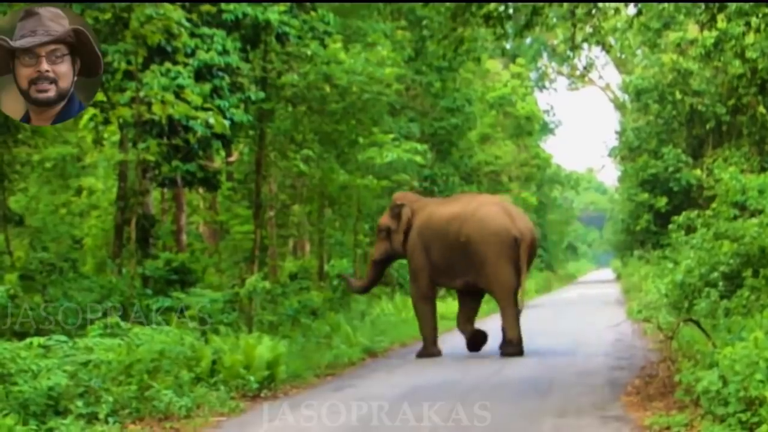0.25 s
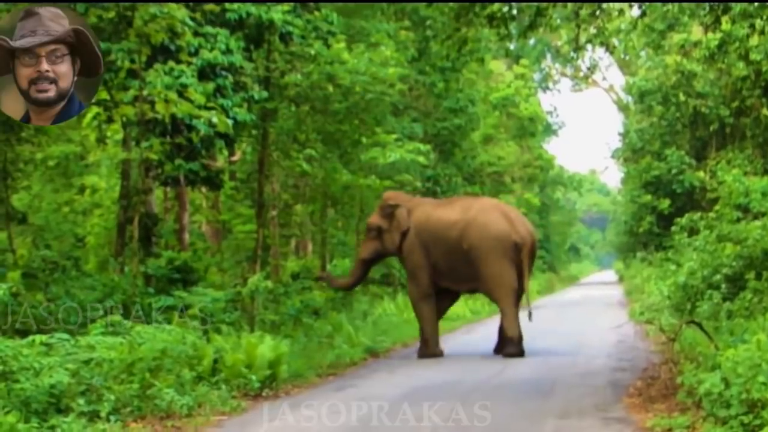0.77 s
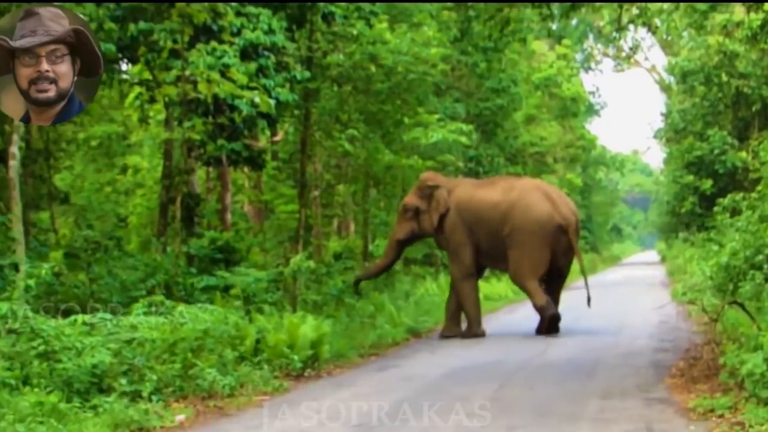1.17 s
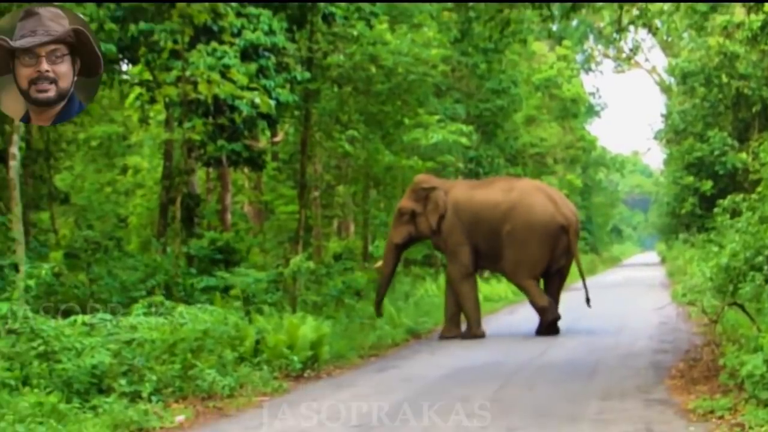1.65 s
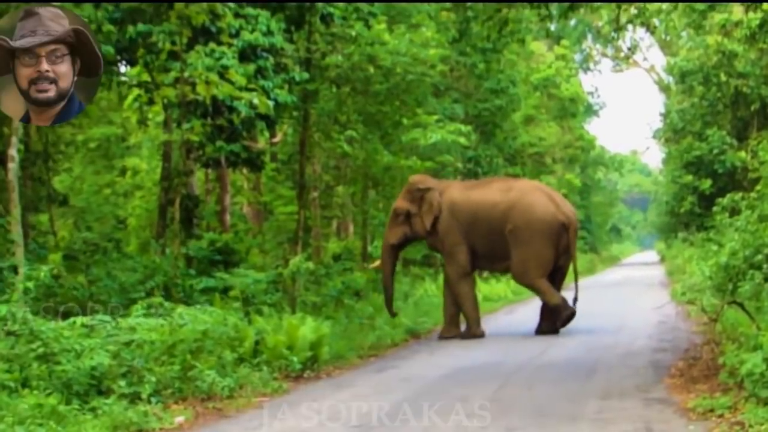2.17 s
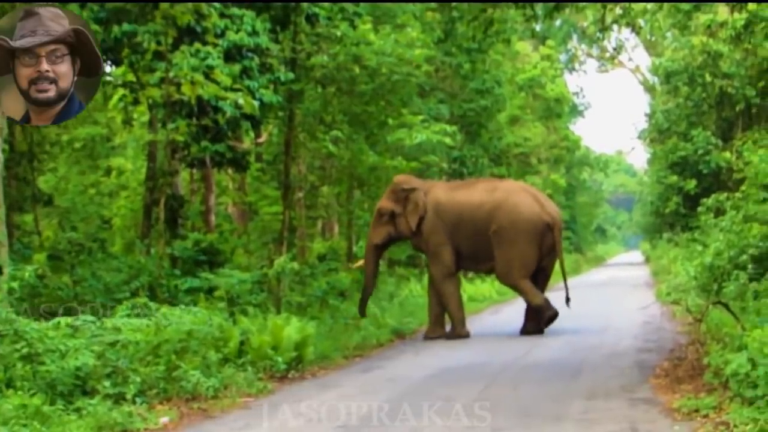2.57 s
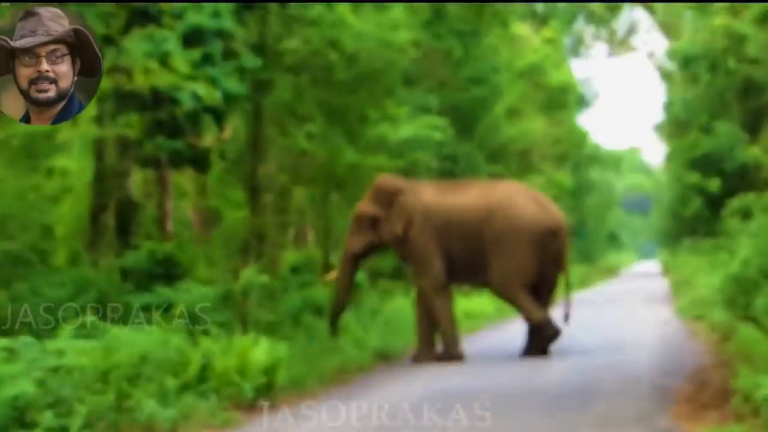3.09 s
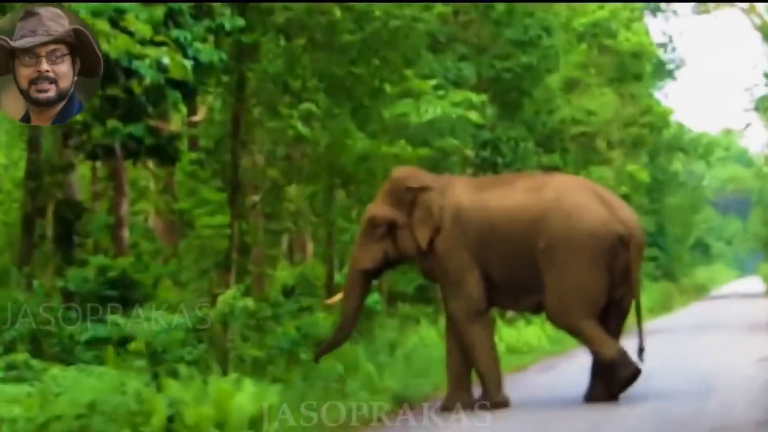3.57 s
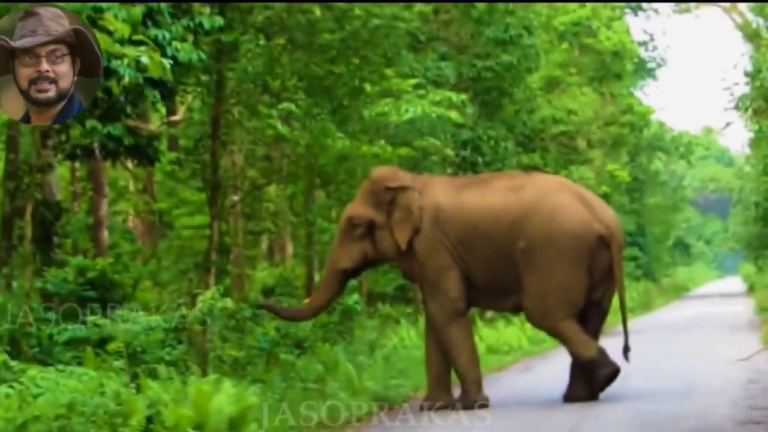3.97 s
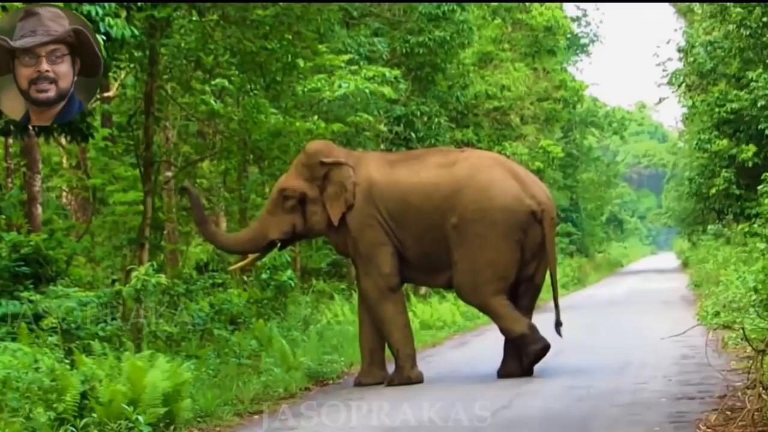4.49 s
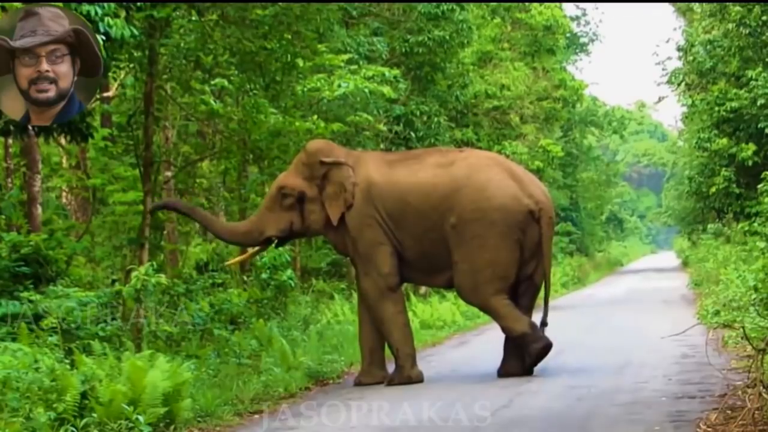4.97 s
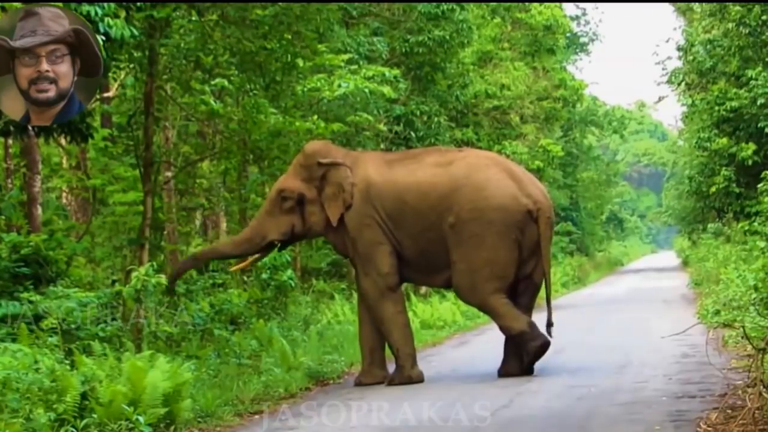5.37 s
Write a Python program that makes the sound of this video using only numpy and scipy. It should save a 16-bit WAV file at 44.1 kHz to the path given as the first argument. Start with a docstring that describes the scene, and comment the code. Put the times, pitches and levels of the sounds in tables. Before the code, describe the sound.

In a forest, a hawk screams twice, each raspy cry rising and then sinking. Between the screams a small bird repeats quick pairs of chips slightly to the left, and another sings mellow whistles. Thin high notes, squeaks and distant birds echo among the trees. Leaves hiss and tick over a low, far-off rumble. Near the end an elephant gives a soft, pulsing rumble.

```python
"""A hawk screams twice over a forest road; a small bird chips in pairs, others flute, squeak and lisp.
Each scream is a pitch arch carried by its second harmonic; the small birds are near-pure glides.
Trunks and leaves scatter the calls into echoes. Under them lie a low distant rumble, a faint drone
and the hiss and ticking of leaves. Near the end an elephant rumbles with slow vocal-fold pulses."""
import sys
import numpy as np
from scipy import signal
from scipy.fft import rfft, irfft, next_fast_len
from scipy.io import wavfile
from scipy.ndimage import uniform_filter1d

SR = 44100
rng = np.random.default_rng(int(sys.argv[2]) if len(sys.argv) > 2 else 0)


def wav_out(sig):
    """Save sig, one row per channel (or a flat mono array), as 16-bit PCM at SR to the path in sys.argv[1]."""
    wavfile.write(sys.argv[1], SR, np.round(np.clip(np.atleast_2d(sig).T, -1, 1) * 32767).astype(np.int16))


N = 248283
TIME = np.arange(N) / SR


def from_db(db):
    """Decibels to gain."""
    return 10 ** (np.asarray(db) / 20)


def unit_rms(x):
    """Scale to rms 1."""
    return x / np.sqrt(np.mean(x ** 2) + 1e-20)


def in_time(points):
    """A (time_s, value) curve at every sample."""
    return np.interp(TIME, *np.transpose(points))


def at_hz(points, hz):
    """A (freq_hz, value) curve read on a log-frequency axis."""
    freq_hz, value = np.transpose(points)
    return np.interp(np.log(hz), np.log(freq_hz), value)


def gate(t, start, end, rise, fall):
    """Window with rounded edges."""
    return np.sin(np.pi / 2 * np.clip(np.minimum((t - start) / rise, (end - t) / fall), 0, 1)) ** 2


def drift(rate_hz):
    """Low-passed random wander, rms 1."""
    pole = np.exp(-40 * np.pi * rate_hz / SR)   # runs at SR / 20
    noise = rng.standard_normal(N // 20 + 4002)
    slow = signal.lfilter([1], [1, -2 * pole, pole * pole], noise)[4000:]
    return np.interp(np.arange(N) / 20, np.arange(len(slow)), unit_rms(slow))


def stereo_noise(spectrum):
    """Coloured noise, most alike in both ears in the bass; rms 1."""
    # freq_hz, left_right_correlation
    likeness = [(60, 0.94), (180, 0.67), (550, 0.028), (1650, 0.66), (4970, 0.51), (15000, 0.033)]
    size = next_fast_len(N)
    hz = np.maximum(np.fft.rfftfreq(size, 1 / SR), 1)
    mid, side = rfft(rng.standard_normal((2, size)))
    alike = at_hz(likeness, hz)
    both = np.sqrt(1 + alike) * mid + np.sqrt(1 - alike) * side * [[1], [-1]]
    return unit_rms(irfft(both * from_db(at_hz(spectrum, hz)), size)[:, :N])


def forest(x, wet_db, t60_s, width):
    """Direct sound plus many small echoes from trunks and leaves."""
    t = TIME[:SR]
    echoes = rng.standard_normal((2, SR)) * (rng.random((2, SR)) < .05)
    echoes *= from_db(-60 * t / t60_s) * (t > .006)
    mid, side = echoes / np.sqrt(np.sum(echoes ** 2, axis=1, keepdims=True))
    response = mid + width * side * [[1], [-1]]
    return x + from_db(wet_db) * signal.fftconvolve(x[None], response, axes=1)[:, :N]


def distant_rumble():
    """Low noise, slowly changing in level."""
    # time_s, level_db
    levels = [(0, -29.5), (1.1, -30), (2.5, -32), (3.3, -34.5), (4.3, -36.5), (4.7, -32)]
    # freq_hz, relative_db
    spectrum = [(12, -47), (20, -5.5), (59, -1.5), (183, -9.5), (320, -18), (541, -24), (687, -24.5),
                (900, -34), (1170, -72), (1980, -120)]
    return from_db(in_time(levels)) * stereo_noise(spectrum) * from_db([[.5], [-.5]])


def foliage(hiss_db, sway_db):
    """Swaying hiss of leaves and one brief rustle."""
    # freq_hz, relative_db
    hiss_spectrum = [(350, -12), (600, -6.5), (687, -3.5), (1230, -4.5), (1930, -6.5), (2070, -5),
                     (4430, -9), (5820, -9), (9620, -17), (15500, -21.5)]
    # freq_hz, relative_db
    rustle_spectrum = [(1500, -2), (4500, -2.5), (11000, -6), (15000, -25)]
    # time_s, level_db
    rustle_levels = [(5.15, -83), (5.2, -40.5), (5.31, -38.5), (5.5, -61)]
    hiss = from_db(hiss_db + sway_db * drift(20)) * stereo_noise(hiss_spectrum)
    rustle = from_db(in_time(rustle_levels) + 2 * drift(40)) * stereo_noise(rustle_spectrum)
    return hiss + rustle


def drone(width_hz):
    """Faint, far-off wavering tones."""
    # pitch_hz, level_db
    tones = [(510, -58.5), (630, -71), (686, -57.5), (821, -58.5)]
    out = np.zeros(N)
    for hz, db in tones:
        phase = 2 * np.pi * hz * TIME
        out += from_db(db) * (drift(width_hz) * np.sin(phase) + drift(width_hz) * np.cos(phase))
    return out


def leaf_ticks(faint_db, per_s, t60_s):
    """A few clear ticks among many faint ones, each a short bright crackle."""
    # start_s, peak_db
    clear_ticks = [(0.4744, -30), (1.3668, -28), (2.5634, -29), (2.868, -29.5), (3.933, -29)]
    clicks = (rng.random(N) < per_s / SR) * from_db(faint_db + 2 * rng.standard_normal(N))
    for start_s, db in clear_ticks:
        clicks[round(start_s * SR)] += from_db(db)
    t = TIME[:SR // 20]
    noise = rng.standard_normal(len(t)) + .5 * rng.standard_normal((2, len(t)))
    band = signal.butter(2, [3500, 10000], "band", fs=SR, output="sos")
    crackle = signal.sosfilt(band, noise * from_db(-60 * t / t60_s))
    return signal.fftconvolve(clicks[None], crackle / np.abs(crackle).max(), axes=1)[:, :N]


def elephant(pulse_hz, jitter):
    """Slow, slightly uneven vocal-fold pulses; the third harmonic carries furthest."""
    # time_s, level_db
    levels = [(4.3, -69), (4.45, -47), (4.62, -31.5), (5.3, -34.5), (5.63, -39)]
    # harmonic, relative_db
    harmonics = [(1, -13), (2, -9), (3, 0), (4, -10), (5, -14.5), (6, -30), (7, -18.5)]
    phase = 2 * np.pi * np.cumsum(pulse_hz * (1 + jitter * drift(11.8))) / SR
    voice = sum(from_db(db) * np.sin(k * phase + rng.uniform(0, 2 * np.pi)) for k, db in harmonics)
    return np.sqrt(2) * from_db(in_time(levels)) * voice


def bird(notes, rise, fall, jitter, flutter_db, octave_db, warble_hz=0, warble_depth=0):
    """Near-pure arched glides; rise and fall are shares of a note's length."""
    out, waver, flutter = np.zeros(N), drift(147), from_db(flutter_db * drift(100))
    for start_s, length_s, first_hz, last_hz, arch_hz, db in notes:
        at = np.flatnonzero((TIME >= start_s) & (TIME < start_s + length_s))
        u = (TIME[at] - start_s) / length_s
        glide_hz = first_hz + (last_hz - first_hz) * u + arch_hz * (1 - (2 * u - 1) ** 2)
        warble = warble_depth * np.sin(2 * np.pi * warble_hz * u * length_s)
        phase = 2 * np.pi * np.cumsum(glide_hz * (1 + warble + jitter * waver[at])) / SR
        tone = np.sin(phase) + from_db(octave_db) * np.sin(2 * phase)
        out[at] += np.sqrt(2) * from_db(db) * gate(u, 0, 1, rise, fall) * flutter[at] * tone
    return out


def far_chorus(per_s, t60_s):
    """Many distant birds, heard as a wash of echoes."""
    # time_s, level_db
    levels = [(0, -45.5), (1.1, -42.5), (2.7, -46.5), (3.1, -56.5), (4.6, -43.5), (5.6, -61)]
    notes = []
    for when, length, above, below, octave in rng.random((round(per_s * TIME[-1]), 5)):
        hz = 1650 * 2 ** octave
        first_hz, last_hz = hz * (1 + 0.2017 * above), hz * (1 - 0.087 * below)
        notes.append((when * TIME[-1], 0.038 + 0.0615 * length, first_hz, last_hz, 0, -60))
    calls = bird(notes, rise=1.0, fall=0.81, jitter=0.0086, flutter_db=-2.5, octave_db=-38,
                 warble_hz=50.0, warble_depth=0.028)
    return from_db(in_time(levels)) * unit_rms(forest(calls, wet_db=36, t60_s=t60_s, width=0.3))


def lisping(length_s):
    """Thin, level notes high in the canopy."""
    # start_s, pitch_hz, level_db
    lisps = [(0.63, 7350, -46.5), (0.931, 7060, -44), (1.11, 8000, -47.5), (1.764, 8230, -49.5),
             (2.058, 6970, -44), (2.255, 7640, -49.5), (3.268, 7640, -48), (3.58, 7160, -49),
             (3.745, 7450, -44)]
    notes = [(s, length_s, hz, hz, 0, db) for s, hz, db in lisps]
    return bird(notes, rise=0.21, fall=0.49, jitter=.013, flutter_db=3.0, octave_db=-50)


def note_run(start, gap_s, count, length_s, first_hz, step_hz, glide, db):
    """Evenly spaced notes stepping in pitch; glide is a note's end pitch over its start pitch."""
    pitches_hz = first_hz + step_hz * np.arange(count)
    return [(start + k * gap_s, length_s, hz, hz * glide, 0, db) for k, hz in enumerate(pitches_hz)]


def chatter(squeak_s, squeak_glide):
    """Rising ticks, low falling clucks and sharp squeaks, all very short glides."""
    tick_run = dict(start=4.617, gap_s=0.04, count=4, length_s=0.0118, first_hz=3310, step_hz=-215, glide=1.3, db=-42)
    cluck_run = dict(start=4.909, gap_s=.0722, count=3, length_s=0.035, first_hz=1286, step_hz=-33, glide=0.694, db=-37.5)
    # start_s, first_hz, level_db
    squeaks = [(4.872, 3290, -44), (4.9, 3600, -42.5), (5.209, 3600, -40), (5.247, 4930, -28),
               (5.268, 3590, -38), (5.308, 5090, -32.5)]
    notes = note_run(**tick_run) + note_run(**cluck_run)
    notes += [(s, squeak_s, hz, hz * squeak_glide, 0, db) for s, hz, db in squeaks]
    return bird(notes, rise=0.17, fall=0.24, jitter=0.019, flutter_db=3.0, octave_db=-26)


def fluting():
    """Mellow song of pure and warbled notes."""
    # start_s, length_s, first_hz, last_hz, arch_hz, level_db
    whistles = [(0.02, 0.19, 2380, 3070, -79.5, -39.5), (1.39, 0.11, 2630, 2355, -18, -39),
                (3.19, 0.043, 2030, 1750, -4, -37), (3.246, .095, 2063, 2100, 134.5, -30),
                (3.51, 0.096, 2254, 1720, 13, -29.5), (3.69, 0.18, 2332, 2015, 110.5, -27),
                (3.91, 0.078, 2100, 1754, 16, -41), (4.245, 0.084, 2014, 1616, -81, -29),
                (4.385, .11, 2130, 1925, -22, -40.5), (4.588, 0.037, 2580, 1817, 92, -35.5),
                (4.832, .14, 2280, 1837, -140, -36.5), (5.222, 0.055, 2610, 2590, 51.5, -36)]
    # start_s, length_s, first_hz, last_hz, level_db
    warbles = [(1.463, 0.257, 1960, 1890, -47.5), (1.772, 0.107, 1935, 1913, -43),
               (1.96, 0.32, 1910, 1830, -44.5), (2.335, 0.112, 1780, 1875, -38),
               (3.342, 0.068, 2126, 2206, -33), (3.481, .075, 2650, 2730, -39.5),
               (4.03, 0.22, 1519, 2130, -32.5)]
    pure = bird(whistles, rise=0.21, fall=0.1, jitter=0.0082, flutter_db=1.5, octave_db=-49)
    notes = [(*glide, 0, db) for *glide, db in warbles]
    return pure + bird(notes, rise=0.2, fall=0.096, jitter=0.016, flutter_db=2.1, octave_db=-45,
                       warble_hz=43.9, warble_depth=0.025)


def chips(shape, starts, jitter, trill_hz=0, trill_depth=0):
    """One learned note, repeated with slight changes."""
    out, waver = np.zeros(N), drift(254)
    age_s, pitch_hz, shape_db = np.transpose(shape)
    t = TIME[:round(age_s[-1] * SR)]
    trill = trill_depth * np.sin(2 * np.pi * trill_hz * t)
    envelope = from_db(np.interp(t, age_s, shape_db)) * gate(t, 0, age_s[-1], 0.00066, 0.0051)
    for start_s, db in starts:
        at = round(start_s * SR) + np.arange(len(t))
        hz = np.interp(t, age_s, pitch_hz) * (1 + trill + jitter * waver[at])
        out[at] += from_db(db) * envelope * np.sin(2 * np.pi * np.cumsum(hz) / SR)
    return np.sqrt(2) * out


def chipping(left_db):
    """Soft opening tips, then pairs of a falling tsip and a trilled chirrup, a little to the left."""
    # start_s, level_db
    tips = [(0.635, -38), (1.157, -33.5), (1.327, -33), (1.528, -35)]
    # age_s, pitch_hz, relative_db
    tsip_shape = [(0, 4348, -23), (.013, 3817, -15), (.021, 3286, -1), (.036, 2964, -3), (.054, 2630, -10),
                  (.066, 2560, -22)]
    # start_s, level_db
    tsips = [(1.801, -23), (2.09, -22.5), (2.385, -23.5), (2.681, -23.5)]
    # age_s, pitch_hz, relative_db
    chirrup_shape = [(0, 3284, -17), (.008, 3227, 1), (.02, 2677, -4), (.034, 2478, 0), (.048, 2340, -8),
                     (.06, 2316, -29)]
    # start_s, level_db
    chirrups = [(1.646, -30), (1.936, -29.5), (2.233, -29.5), (2.528, -29.5), (2.852, -31.5)]
    tip_s, first_hz, last_hz = 0.0385, 3400, 2938
    notes = [(s, tip_s, first_hz, last_hz, 0, db) for s, db in tips]
    song = bird(notes, rise=0.27, fall=0.24, jitter=0.035, flutter_db=1.5, octave_db=-26)
    song += chips(tsip_shape, tsips, jitter=0.016)
    song += chips(chirrup_shape, chirrups, jitter=0.0334, trill_hz=71.6, trill_depth=0.056)
    pan = from_db([[left_db / 2], [-left_db / 2]])
    return forest(song, wet_db=-5.5, t60_s=0.56, width=0.55) * pan


def hawk(jitter, rasp, rasp_s, break_rasp, flutter_db, root_db):
    """Arched screams: the voice rasps until it catches, breaks once and mellows as its pitch sinks."""
    # time_s, pitch_hz
    arch = [(0.776, 1224), (0.788, 1280), (0.81, 1529), (0.85, 1579), (0.896, 1542), (0.932, 1433),
            (1.006, 1257), (1.1, 1190), (1.14, 1073), (1.242, 1013), (1.298, 940.5), (1.33, 923.4)]
    # start_s, top_lift_share, fall_stretch, level_db, catch_db, break_db
    screams = [(0.775, 0.00028, 1.0, -14, 7, 14), (4.054, 0.032, 1.17, -14.5, 16, 11.5)]
    # overtone colour: freq_hz, db_re_second_harmonic
    throat = [(3600, -34), (4200, -10), (4720, -17), (4890, -27), (5850, -42), (6260, -14), (6500, -15.5),
              (7100, -35), (8500, -38), (9600, -21), (10800, -37), (12300, -42), (13000, -29)]
    # times on the arch's clock, which fall_stretch slows after rise_s
    lead_s, attack_s, rise_s, release_s, fade_s = .035, .006, 0.057, 0.046, 0.17
    catch_at_s, catch_s = 0.02, 0.0048
    break_at_s, break_in_s, break_out_s = 0.1982, 0.036, .012
    lead_db, soften_db, darken_db = -14, 2.5, 9
    tail_hz, tail_width_hz, tail_db = 1162, 34, 19.5   # the voice thins below tail_hz
    out, waver, grit, flutter = np.zeros(N), drift(253), drift(640), from_db(flutter_db * drift(110))
    arch_s, arch_hz = np.transpose(arch)
    arch_s = arch_s - arch_s[0]
    end_s = arch_s[-1] + release_s
    for start_s, lift, stretch, db, catch_db, break_db in screams:
        age = TIME - start_s
        clock = np.minimum(age, rise_s) + np.maximum(age - rise_s, 0) / stretch
        at = np.flatnonzero((clock > -lead_s) & (clock < end_s))
        t = clock[at]
        hz = uniform_filter1d(np.interp(t, arch_s, arch_hz), size=1000)
        effort = (hz - arch_hz.min()) / np.ptp(arch_hz)
        hz = hz * (1 + lift * effort ** 2)
        catch = np.exp(-((t - catch_at_s) / catch_s) ** 2)
        crack = np.exp(-((t - break_at_s) / np.where(t < break_at_s, break_in_s, break_out_s)) ** 2)
        roughness = rasp * np.exp(-np.maximum(t, -lead_s / 2) / rasp_s) + break_rasp * crack
        phase = 2 * np.pi * np.cumsum(hz * (1 + jitter * waver[at] + roughness * grit[at])) / SR
        thin_db = tail_db / (1 + np.exp((hz - tail_hz) / tail_width_hz))
        second_db = db - catch_db * catch - break_db * crack - thin_db - soften_db * (1 - effort)
        # the weak fundamental swells and fades half as much in dB
        voice = from_db(root_db + .5 * second_db) * np.sin(phase)
        voice += from_db(second_db) * np.sin(2 * phase)
        for k in range(3, 9):
            colour_db = at_hz(throat, k * hz) - darken_db * (k - 2) * (1 - effort)
            voice += from_db(second_db + colour_db) * np.sin(k * phase)
        attack = from_db(lead_db * np.clip(1 - t / attack_s, 0, 1))
        envelope = attack * gate(t, -lead_s, end_s, lead_s / 2, fade_s)
        out[at] += np.sqrt(2) * voice * envelope * flutter[at]
    return out


def scene():
    """Birds at several distances, over leaves, low background and an elephant."""
    screams = hawk(jitter=0.003, rasp=0.052, rasp_s=.027, break_rasp=0.014,
                   flutter_db=1.08, root_db=-28.5)
    birds = (forest(screams, wet_db=-17, t60_s=0.29, width=0.74)
             + chipping(left_db=4.5)
             + forest(fluting(), wet_db=-11.0, t60_s=0.28, width=0.77)
             + forest(chatter(squeak_s=0.016, squeak_glide=.87), wet_db=-5.5, t60_s=0.92, width=0.87)
             + forest(lisping(length_s=0.037), wet_db=5, t60_s=0.98, width=0.4)
             + far_chorus(per_s=23, t60_s=0.74))
    background = (distant_rumble() + foliage(hiss_db=-39.5, sway_db=1.6) + drone(width_hz=13.0)
                  + leaf_ticks(faint_db=-32.5, per_s=12, t60_s=0.062))
    return birds + background + elephant(pulse_hz=23.54, jitter=0.0194)


def record(dry):
    """Steep low-pass at 15.7 kHz."""
    return signal.sosfilt(signal.ellip(12, .1, 90, 15700, fs=SR, output="sos"), dry)


dry = scene()
out = record(dry)
wav_out(out)
```